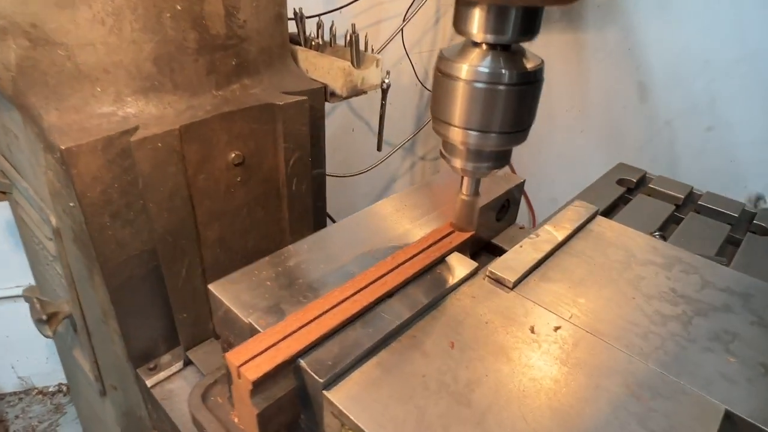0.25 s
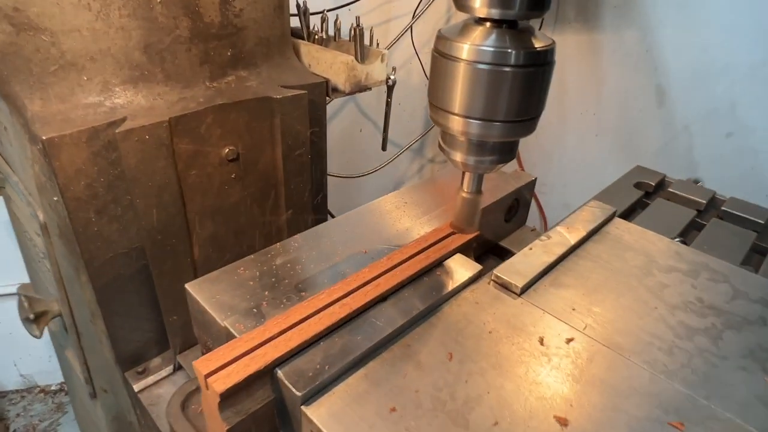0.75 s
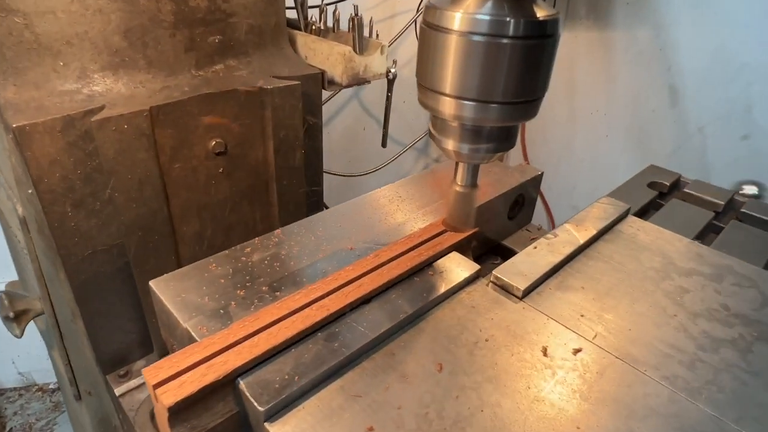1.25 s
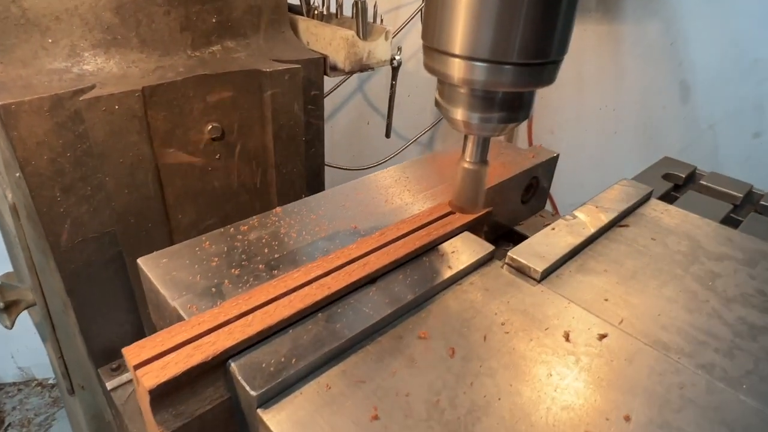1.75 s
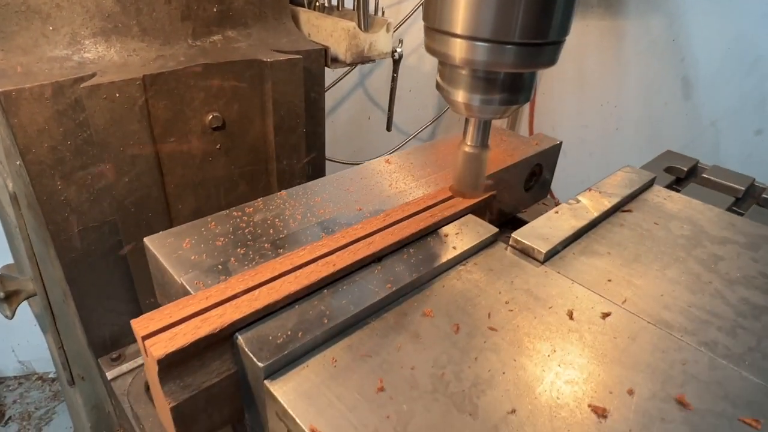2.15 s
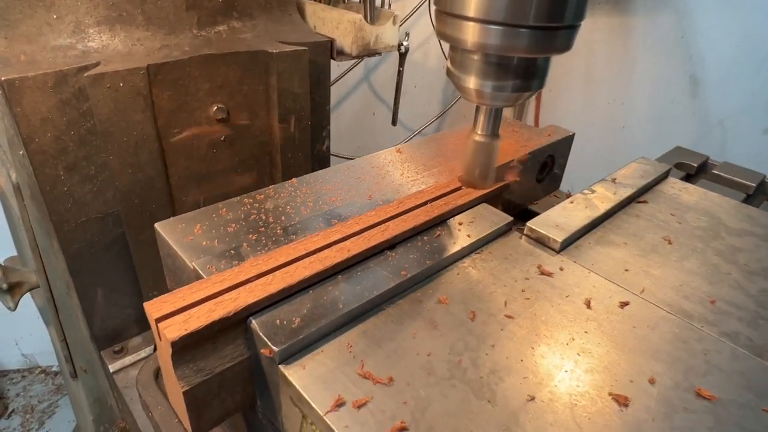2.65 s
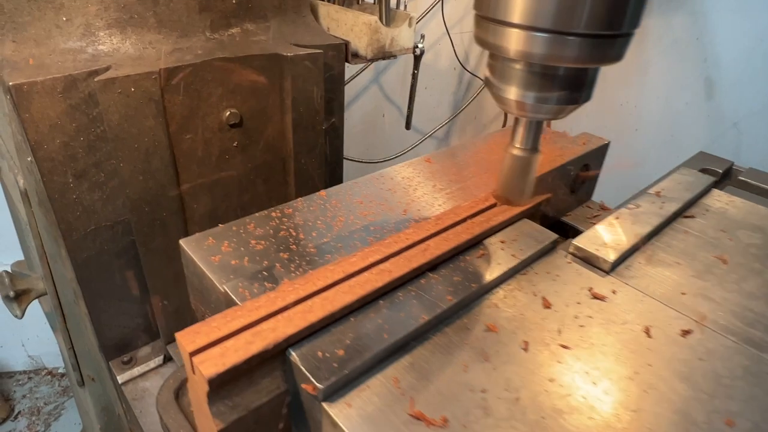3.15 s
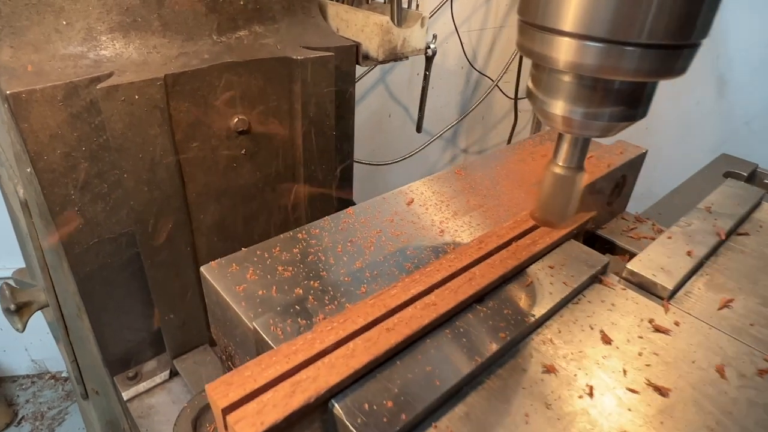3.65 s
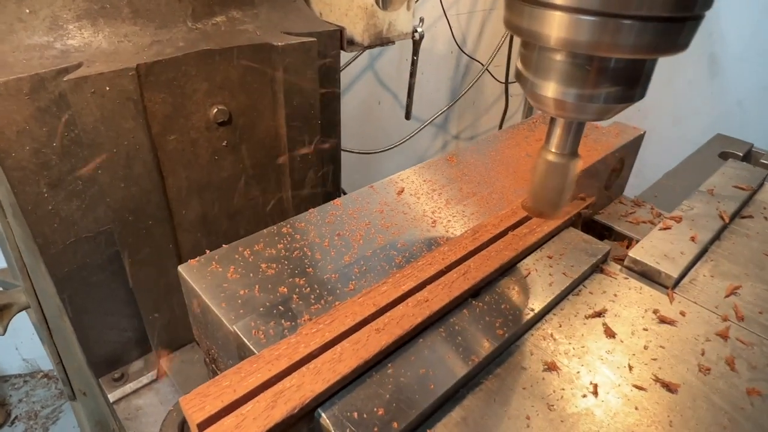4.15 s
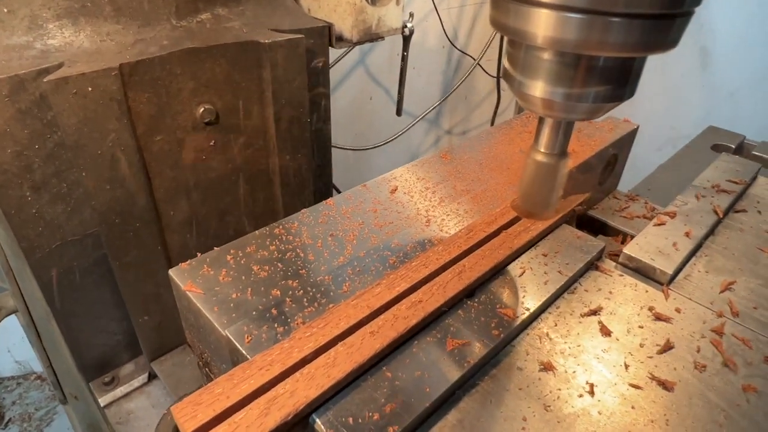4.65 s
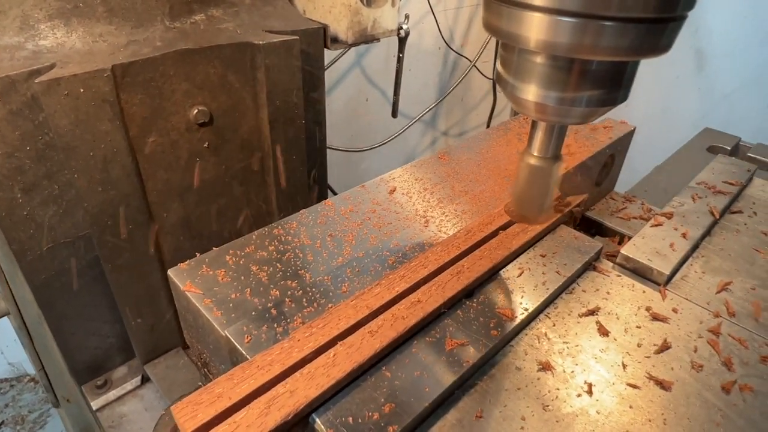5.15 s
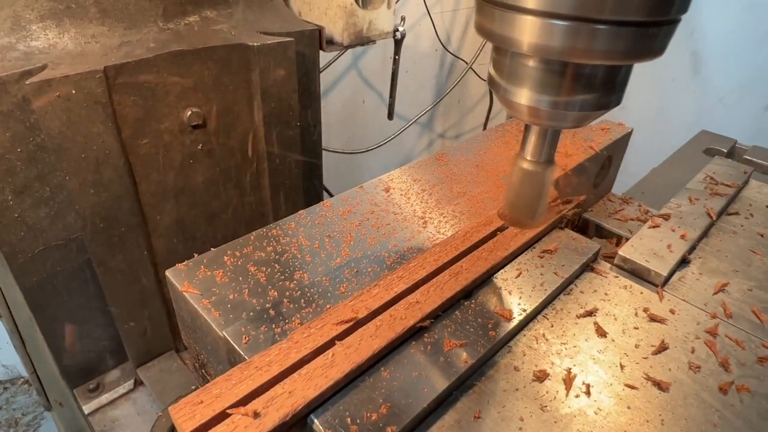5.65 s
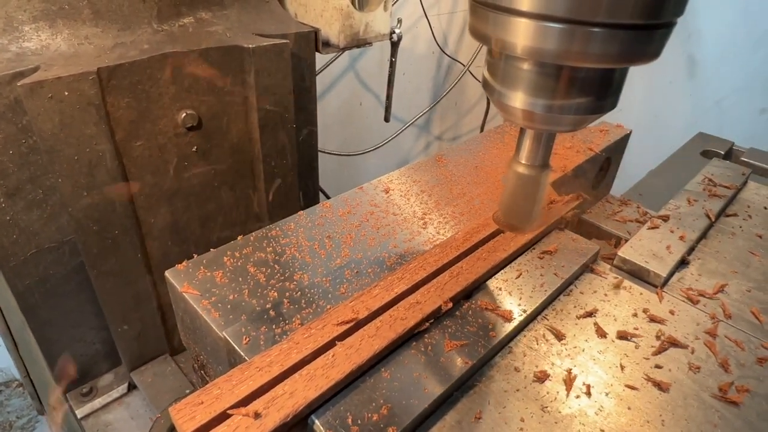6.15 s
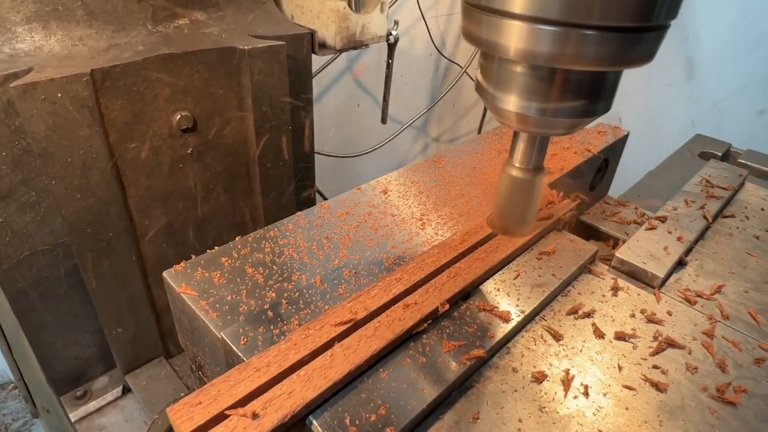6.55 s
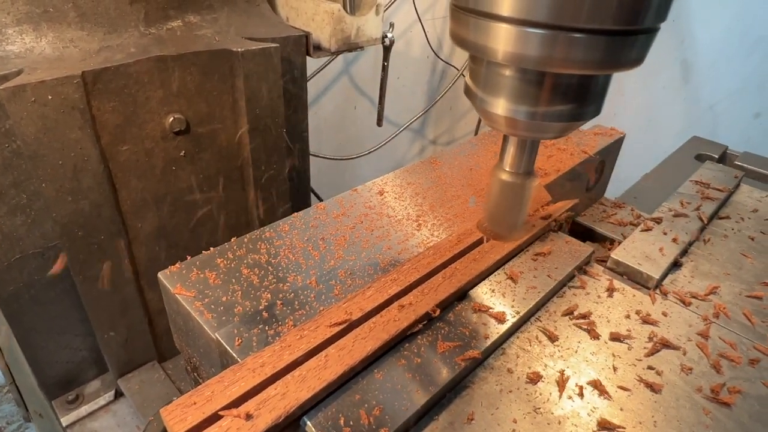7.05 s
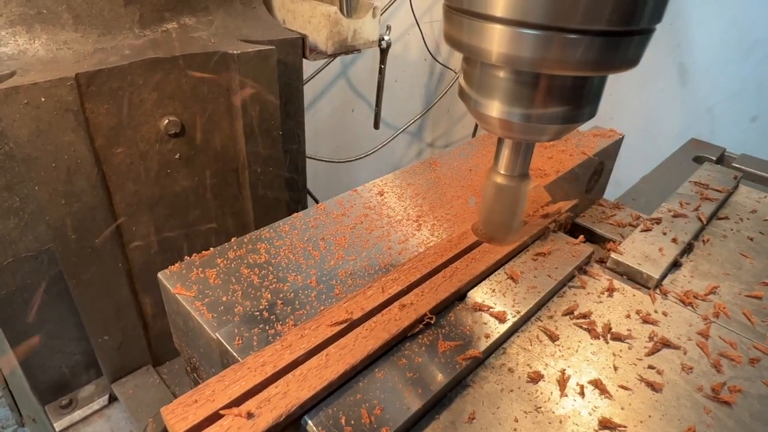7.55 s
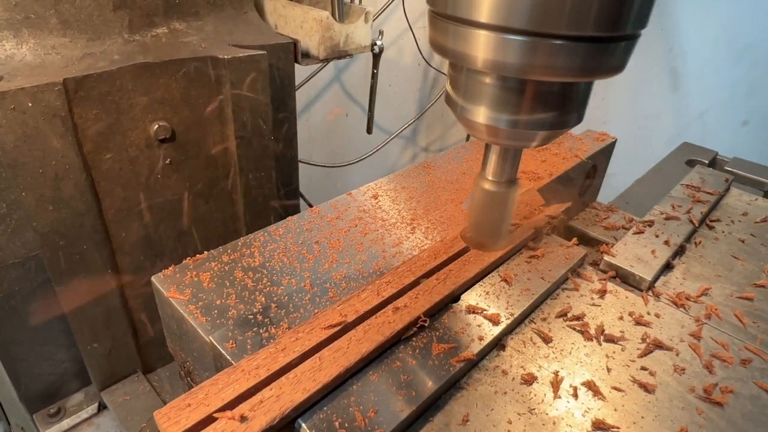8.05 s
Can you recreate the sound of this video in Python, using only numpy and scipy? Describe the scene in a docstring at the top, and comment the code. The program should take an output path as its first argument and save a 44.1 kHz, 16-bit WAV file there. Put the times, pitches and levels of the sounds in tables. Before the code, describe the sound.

Close up in a small, reflective workshop, a fast cutter tears fibres from a wooden handle without pause. The harsh, dry rasp and fine dusty hiss dominate, roughened by a rapid flutter at the spindle's speed. Metallic whistling chatter comes and goes, and the bite slackens for moments. Under it run wavering motor tones, gear whine and dull drive rumble. A few short, sharp wood snaps stand out. It ends still cutting.

```python
"""A hard, fast rasp: a milling machine at about 57 turns a second cuts a groove along a wooden handle in a vice.
Once a turn the proudest tooth tears through the fibres; tool and wood ring with it, each part as a set of
resonances driven by fibre snaps and a jolt, in a colour that shifts as the cut advances. A few splinters crack.
Under the rasp the spindle drones, gears whine and the motor hums, all as wavering sines; the drive rumbles as
shaped noise. Around the cut and the splinters a small, hard-walled workshop adds dense reflections."""
import sys
import numpy as np
from scipy import signal
from scipy.fft import rfft, irfft
from scipy.io import wavfile
from scipy.ndimage import uniform_filter1d, map_coordinates

SR = 44100
rng = np.random.default_rng(int(sys.argv[2]) if len(sys.argv) > 2 else 0)


def store_pcm(level_fs):
    """Save levels as 16-bit WAV."""
    pcm = np.round(np.clip(level_fs, -1, 1) * 32767).astype(np.int16)
    wavfile.write(sys.argv[1], SR, np.atleast_2d(pcm).T)


N = 365148

# Resonances of the parts that ring both under the cut and when a splinter snaps.
# Each row: centre in Hz, width in Hz, level in dB.
HANDLE_MODES = [(4625, 570, -8)]
GROOVE_MODES = [(5446, 490, 0.44), (6110, 680, -0.78)]
RASP_MODES = [(7130, 420, 0.5), (7506, 234, 4), (8090, 230, 2), (8190, 215, 2.5), (8810, 600, 4),
              (9500, 76, 0), (9540, 500, 3.5), (7800, 1800, -16.5)]
CHIP_MODES = [(11106, 760, 6), (11580, 2200, -7)]


def cut(turns):
    """The tooth's pass gates the breaking fibres, which set wood and steel ringing and spray chips and dust."""
    # How hard the cutter bites. Each row: time in seconds, level in dB.
    bite = [(0, -14), (1.6, -15), (2.8, -16), (4.1, -15.6), (5.4, -17.2), (6.2, -16), (7.3, -16),
            (8.28, -18.5)]
    # How far the proudest tooth stands out from the rest of the turn.
    # Each row: time in seconds, factor on its force in dB.
    standout = [(0, 1.0), (.9, 1.7), (2.4, 0.96), (4.8, 1.25), (5.8, 0.56), (7.3, 1.4), (8.28, .75)]
    # Centres of the rasp of tearing fibres and of the hiss of fine dust. Each row: time in seconds, centre in Hz.
    rasp_centre = [(0, 7300), (2.3, 7200), (5, 8490), (8.28, 8030)]
    dust_centre = [(0, 15000), (1.6, 13500), (5.1, 13250), (5.7, 14800), (6.6, 14700), (7.2, 13100),
                   (8.28, 13400)]
    # Resonances of vice, table, cutter and dust. Each row: centre in Hz, width in Hz, level in dB.
    vice_modes = [(2111, 190, 4.5), (1980, 480, -3)]
    table_modes = [(3175, 156, -1.3), (3424, 210, 2), (3847, 124, -1.8)]
    cutter_modes = [(4212, 233, 0)]
    dust_modes = [(13100, 610, 0), (14570, 770, -6.5), (15700, 1700, 1)]
    # Each part gains or loses as the cut advances, and swells and fades slowly about that trend. Each part's row:
    # dB relative to the bite at the start, dB per second, swing in dB, period in seconds, time of a crest in seconds.
    shares = {"vice": (-25, 1.81, 1.4, 5, 4), "table": (-18, .5, 3, 2.5, 2.0),
              "cutter": (-18.5, 1.31, 1.4, 3, 5), "handle": (-4, -1.07, 1.45, 3, 2.14),
              "groove": (-8, -.92, 2.1, 2, 2.5), "rasp": (-2, -0.24, 0.96, 5.5, 1.5),
              "chips": (-13.5, 0.36, 1.8, 5.8, 1.4), "dust": (-14.8, 0.9, 3.9, 3.08, 3.3)}
    # Force on the teeth through one turn, long and even under the proudest one.
    # Each row: share of the turn, force in dB before the factors below.
    tooth = [(0, -12), (.15, -14), (.28, -11.5), (.5, -19), (.57, -7), (.64, -.5), (.71, -2.5), (.78, 1),
             (.84, -.7), (.92, -8), (1, -12)]

    bite_db, = in_time(bite)
    contrast, = in_time(standout)
    rasp_hz, = in_time(rasp_centre)
    dust_hz, = in_time(dust_centre)
    cutter_db, table_db, whistle_db = chatter()
    lift_db = {"cutter": cutter_db, "table": table_db}
    # a deep pass leaves less wood for the next one
    depth_db = 0.47 * np.diff(rng.standard_normal(500))[turns.astype(int)]
    regular = fibres(turns, memory_turns=17.0, grain_db=2.0)
    fresh = crackle(per_s=14000, grain_db=2.5)
    jolt = knock(turns, deepest=.76)

    def force(repeat, sharpness, jolt_db, lead):
        """Repeating and fresh snaps under the tooth, a share of a turn early, and the jolt as the chip lets go."""
        tooth_db = contrast * np.interp((turns + lead) % 1, *np.transpose(tooth)) + depth_db
        breaking = np.sqrt(repeat) * regular + np.sqrt(1 - repeat) * fresh
        snaps = from_db(sharpness * tooth_db) * breaking
        return rms_one(snaps) + from_db(jolt_db) * jolt

    # heavy parts follow the repeating fibres most closely, chips and dust least
    heavy = force(repeat=0.77, sharpness=0.98, jolt_db=-9, lead=0.026)
    flexing = force(repeat=0.67, sharpness=0.9, jolt_db=-8.5, lead=0.062)
    bending = force(repeat=0.55, sharpness=1.08, jolt_db=-17.5, lead=0.04)
    tearing = force(repeat=0.34, sharpness=1.0, jolt_db=-28, lead=0.027)
    spray = force(repeat=0.2, sharpness=2.5, jolt_db=-30, lead=0.023)
    parts = {"vice": body(heavy, vice_modes),
             "table": body(heavy, table_modes),
             "cutter": body(flexing, cutter_modes),
             "handle": handle_whistle(bending, whistle_db) + body(bending, HANDLE_MODES),
             "groove": body(bending, GROOVE_MODES),
             "rasp": moving_body(tearing, RASP_MODES, rasp_hz, fall_db=4.5, patchy_db=1.8),
             "chips": body(spray, CHIP_MODES),
             "dust": moving_body(spray, dust_modes, dust_hz, fall_db=5.5, patchy_db=2.5)}
    total = np.zeros(N)
    for name, part in parts.items():
        level_db = bite_db + swell(*shares[name]) + lift_db.get(name, 0) - slip_loss(name)
        total += from_db(level_db) * evened(workshop(part))
    return total


def fibres(turns, memory_turns, grain_db):
    """Each pass meets nearly the same fibres as the last, so their snaps repeat and change only slowly."""
    steps = 770  # points around one turn
    keep = np.exp(-1 / memory_turns)
    fresh = rng.standard_normal((2, 600, steps))
    # each point remembers its value from turn to turn; the first 100 turns only settle
    snaps = signal.lfilter([np.sqrt(1 - keep ** 2)], [1, -keep], fresh, axis=1)[:, 100:]
    track = (snaps[0] * from_db(grain_db * snaps[1])).ravel()
    return rms_one(map_coordinates(track, [turns * steps], order=3))


def crackle(per_s, grain_db):
    """Fresh fractures of uneven size, at random moments and of either sign."""
    size_db = grain_db * np.minimum(rng.exponential(1, N), 4)
    sizes = from_db(size_db) * rng.choice([-1, 1], N)
    return rms_one(sizes * (rng.random(N) < per_s / SR))


def knock(turns, deepest):
    """One sharp jolt a turn, where the chip is thickest and breaks away."""
    offset_samples = ((turns - deepest + .5) % 1 - .5) / np.gradient(turns)
    return rms_one(np.sinc(offset_samples / 2) * np.exp(-(offset_samples / 10) ** 2))


def handle_whistle(force, whistle_db):
    """The handle rings higher as the cutter moves in over the jaws, ever more slowly towards a limit."""
    start_hz, limit_hz, settle_s, ring_db = 4530, 5220, 4.4, -2.5
    ring_hz = limit_hz + (start_hz - limit_hz) * np.exp(-np.arange(N) / SR / settle_s)
    return from_db(ring_db + whistle_db) * moving_resonance(force, ring_hz, width_hz=240)


def chatter():
    """The lift in dB of cutter, table and the handle's whistle during the bouts of chatter."""
    # Each row: middle in seconds, length in seconds, lift in dB of the cutter, of the table and of the whistle.
    bouts = [(1.4, .7, -1, 0, 9), (2.02, .6, 6, -2, 0), (2.743, 0.62, 7, 3, 3), (3.412, 0.4, 7.5, 2.5, 7),
             (3.992, 0.36, 6.5, -6, -1), (4.497, 0.24, 1.5, 3, -3), (4.927, .65, 7.5, -0.5, 3),
             (5.57, 0.55, 2.5, 10, -1), (6.805, 0.37, 4, -1, 0), (7.49, 0.72, 5, 0.5, -5)]
    return sum(np.outer(lifts_db, bout(s, length_s)) for s, length_s, *lifts_db in bouts)


def slip_loss(name):
    """In a slip the teeth rub more than they tear: tearing and spray lose most, what only rings loses a share."""
    # Each row: middle in seconds, length in seconds, loss of rasp, chips and dust in dB.
    slips = [(2.58, .2, 2.7), (2.9, 0.096, 3.9), (3.27, 0.14, 2.5), (4.3, .23, 6.2), (4.95, .45, 1.5)]
    ringing_share = 0.37
    loss_db = sum(db * bout(s, length_s) for s, length_s, db in slips)
    return loss_db if name in ("rasp", "chips", "dust") else ringing_share * loss_db


def splinters(decay_s):
    """A larger piece of wood snaps: a decaying noise burst rings the wood in a short, bright crack."""
    # Each row: start in seconds, peak in dB before the reflections.
    snaps = [(2.4723, -2), (4.603, -9), (7.368, -15), (7.373, -19)]
    t, out = np.arange(N) / SR, np.zeros(N)
    for s, db in snaps:
        burst = rng.standard_normal(N) * (t >= s) * np.exp(-abs(t - s) / decay_s)
        crack = body(burst, HANDLE_MODES) + 0.31 * body(burst, GROOVE_MODES)
        crack += 0.28 * body(burst, RASP_MODES) + 0.091 * body(burst, CHIP_MODES)
        out += from_db(db) * crack / abs(crack).max()
    return workshop(out)


def machine(turns):
    """Spindle drone, gear whine, motor tones and the rumble of the drive, which grows slightly as the cut advances."""
    # Drone of the spindle. Each row: multiple of the speed, level in dB relative to drone_db.
    drone_tones = [(1, -32), (3, -22), (4, -14), (5, -16), (6, -19.5), (7, -6.5), (11, -35), (13, -10.5),
                   (17, -13), (19, -13), (20, -16.5), (22, -11), (25, -15.5), (27, -11)]
    drone_db = -35
    # The clearest multiples of the speed swell and fade as the microphone moves through the room's standing waves.
    # Each multiple's row: dB at the start, dB per second, swing in dB, period in seconds, time of a crest in seconds.
    whine_levels = {2: (-49, .5, 4, 5.6, 5.1), 8: (-42.5, 0.68, 3.5, 5.5, 3.7),
                    9: (-34.5, -1.1, 2, 0.5, 1.75), 10: (-35, -2.5, 4.5, 3, 2),
                    12: (-38.5, 0.68, 2.2, 9, 4), 14: (-44.5, 0.77, 2.5, 3, 3), 15: (-48.5, 1, 3.9, 4, 3),
                    16: (-38.5, -0.43, 5, 5, 2), 18: (-35.5, -1.3, 3.5, 6.5, 6.5),
                    24: (-30.5, -.5, 1.3, 5.5, 1), 26: (-37, -.2, 2.9, 12.5, 5)}
    # Tones of the motor and the other shafts. Each row: frequency in Hz, level in dB.
    motor_tones = [(67, -60.5), (101.3, -47), (252, -52.5), (261, -50.5), (465, -42.5), (579, -41.5),
                   (591, -41.5), (654, -47), (720, -40.5), (1069, -50), (1165, -43), (1171, -45),
                   (1313, -57), (1358, -45.5), (1436, -45), (1456, -41.5), (1545, -46)]
    # The loudest tone of the drive swells likewise, with the same columns as the whine.
    drive_level = (-34, -0.03, 4, 6, 4.7)
    drive_hz = 534.5
    # Spectrum of the rumble. Each row: frequency in Hz, relative level in dB per Hz.
    rumble_spectrum = [(25, -36), (48, -35), (80, -18), (125, -7.5), (190, -8.5), (250, -18), (330, -7.5),
                       (400, -3), (520, 2), (680, -3), (920, -3), (1450, -7), (1750, -10.5), (3000, -15),
                       (15000, -14.5)]
    rumble_db, rumble_rise_db_per_s = -24, 0.13

    t = np.arange(N) / SR
    drone = sum(from_db(drone_db + db) * tone(k * turns, waver_db=3.5, waver_rate=0.67, slip=0.31)
                for k, db in drone_tones)
    whine = sum(from_db(swell(*level)) * tone(k * turns, waver_db=2.0, waver_rate=3.5, slip=0.19)
                for k, level in whine_levels.items())
    motor = sum(from_db(db) * tone(hz * t, waver_db=2.35, waver_rate=3.6, slip=0.85) for hz, db in motor_tones)
    drive = from_db(swell(*drive_level)) * tone(drive_hz * t, waver_db=2.7, waver_rate=0.74, slip=0.079)
    level_db = rumble_db + rumble_rise_db_per_s * t + 0.91 * drift(15)
    rumble = from_db(level_db) * shaped_noise(rumble_spectrum)
    return drone + whine + motor + drive + rumble


def tone(cycles, waver_db, waver_rate, slip):
    """A sine of rms near 1 that wavers in level (dB) and slips a little in phase (radians)."""
    angle = 2 * np.pi * ((cycles + rng.random()) % 1) + slip * drift(waver_rate)
    return np.sqrt(2) * np.sin(angle) * from_db(waver_db * drift(waver_rate))


def shaped_noise(spectrum):
    """Noise with a given spectrum, rms 1."""
    hz, db = np.transpose(spectrum)
    gain = from_db(np.interp(np.log(np.fft.rfftfreq(N, 1 / SR) + 1), np.log(hz), db))
    return rms_one(irfft(rfft(rng.standard_normal(N)) * gain, N))


def workshop(x, count=6):
    """Direct sound and dense reflections, whose pattern changes as the hand-held microphone moves."""
    t60_s, reflections_db = 0.27, -3.5
    t, out = np.arange(SR // 3) / SR, np.zeros(N + SR)
    hop = N // (count - 1) + 1
    # cross-fade from one microphone place to the next
    for centre in range(0, hop * count, hop):
        at = np.arange(max(centre - hop, 0), min(centre + hop, N))
        fade = np.cos(np.pi / 2 * (at - centre) / hop)
        tail = rng.standard_normal(len(t)) * from_db(-60 * t / t60_s) * (t > .003)
        wet = signal.fftconvolve(x[at] * fade, tail / np.linalg.norm(tail))
        out[at[0]:at[0] + len(wet)] += wet
    return x + from_db(reflections_db) * out[:N]


def resonance(x, hz, width_hz):
    """A steep-sided resonance with gain 1 on top."""
    edges = np.clip([hz - width_hz / 2, hz + width_hz / 2], 20, SR / 2 - 100)
    return signal.sosfilt(signal.butter(2, edges, "band", fs=SR, output="sos"), x)


def body(force, modes):
    """A part ringing in all its resonances."""
    return sum(from_db(db) * resonance(force, hz, width) for hz, width, db in modes)


def moving_resonance(x, hz, width_hz):
    """A resonance whose centre follows a curve: shift down, low-pass, shift back."""
    carrier = np.exp(2j * np.pi * np.cumsum(hz) / SR)
    low_pass = signal.butter(2, width_hz / 2, fs=SR, output="sos")
    return 2 * (signal.sosfilt(low_pass, x / carrier) * carrier).real


def moving_body(force, modes, centre_hz, fall_db, patchy_db):
    """Resonances far from a moving centre are driven less (dB per kHz), and each swells with the grain of the wood."""
    out = np.zeros(N)
    for hz, width, db in modes:
        level_db = db - fall_db * abs(hz - centre_hz) / 1000 + patchy_db * drift(4.2)
        out += from_db(level_db) * resonance(force, hz, width)
    return out


def swell(start, per_s, swing, period_s, crest_s):
    """A steady trend with a slow rise and fall about it."""
    t = np.arange(N) / SR
    return start + per_s * t + swing * np.cos(2 * np.pi * (t - crest_s) / period_s)


def bout(middle_s, length_s):
    """An envelope that builds up, holds and dies away."""
    return np.exp(-(2 * (np.arange(N) / SR - middle_s) / length_s) ** 4)


def drift(rate):
    """Slow chance with spread 1: noise through two equal low-passes at rate (Hz), drawn every 40 samples."""
    r = np.exp(-2 * np.pi * rate * 40 / SR)
    # the first 2000 values only settle
    slow = signal.lfilter([1], [1, -2 * r, r * r], rng.standard_normal(N // 40 + 2002))[2000:]
    return np.interp(np.arange(N) / 40, np.arange(len(slow)), rms_one(slow))


def in_time(rows):
    """Each column of a curve at every sample."""
    s, *columns = np.transpose(rows)
    return [np.interp(np.arange(N) / SR, s, c) for c in columns]


def evened(x):
    """Hold the level at 1 over a few turns (4620 samples), leaving the pulses within them."""
    return x / np.sqrt(uniform_filter1d(x ** 2, size=4620) + 1e-12)


def rms_one(x):
    """Scale to rms 1."""
    return x / np.sqrt(np.mean(x ** 2) + 1e-20)


def from_db(db):
    """Decibels to gain."""
    return np.exp(np.asarray(db) * (np.log(10) / 20))


def scene():
    """One spindle, wavering slightly in speed, drives both the cut and the machine."""
    # Each row: time in seconds, spindle speed in turns per second.
    spindle = [(0, 57.28), (2.5, 57.285), (4, 57.32), (6, 57.355), (8.28, 57.33)]
    speed, = in_time(spindle)
    start_turn = .06
    turns = start_turn + np.cumsum(speed) / SR + 0.0019 * drift(3.9)
    return (cut(turns) + splinters(decay_s=0.0018) + machine(turns))[None]


def record(dry):
    """The highest peaks are rounded off and the top is cut."""
    ceiling, cutoff_hz = .95, 15720
    rounded = dry / (1 + (dry / ceiling) ** 8) ** (1 / 8)
    return signal.sosfilt(signal.ellip(12, .1, 80, cutoff_hz, fs=SR, output="sos"), rounded)


dry = scene()
out = record(dry)
store_pcm(out)
```